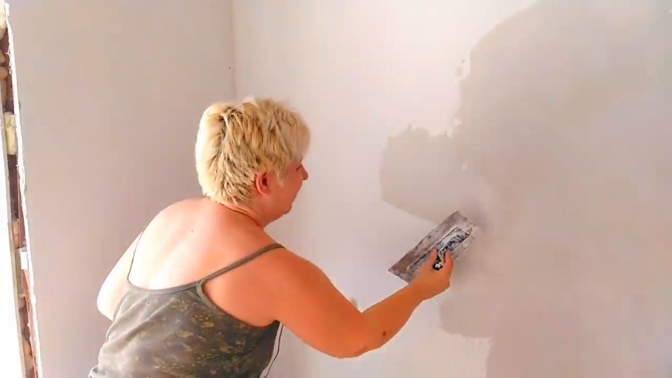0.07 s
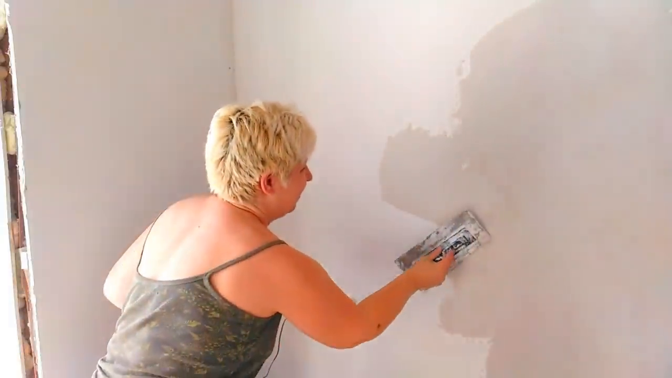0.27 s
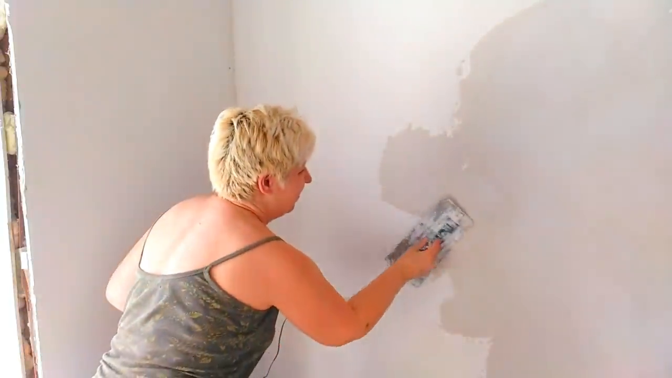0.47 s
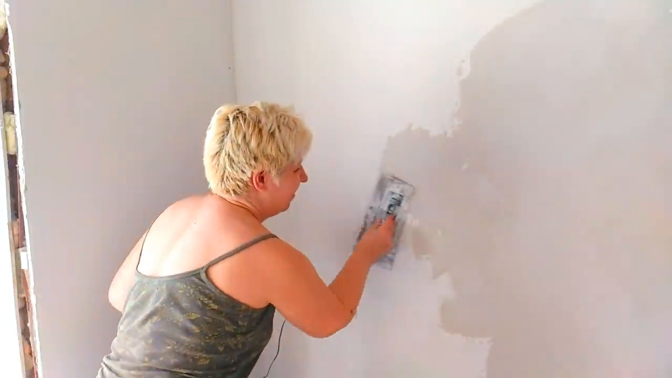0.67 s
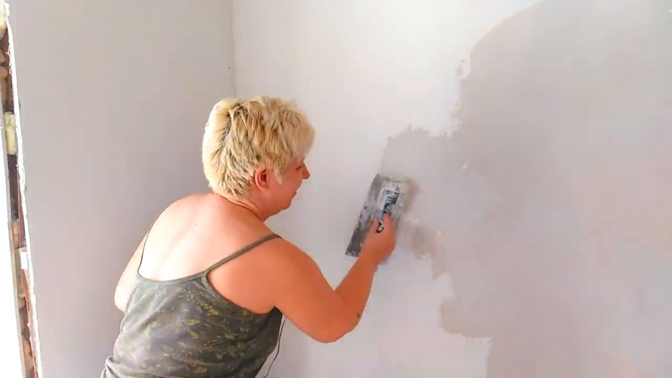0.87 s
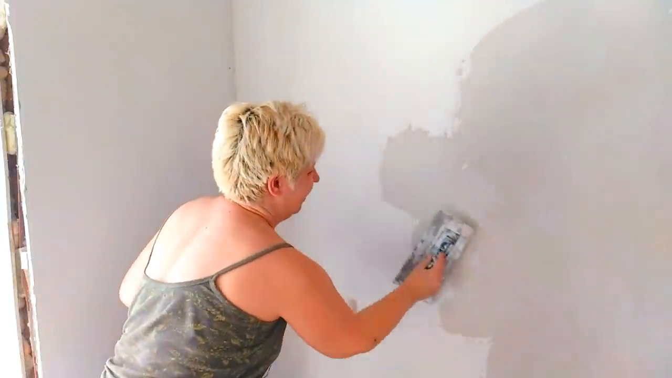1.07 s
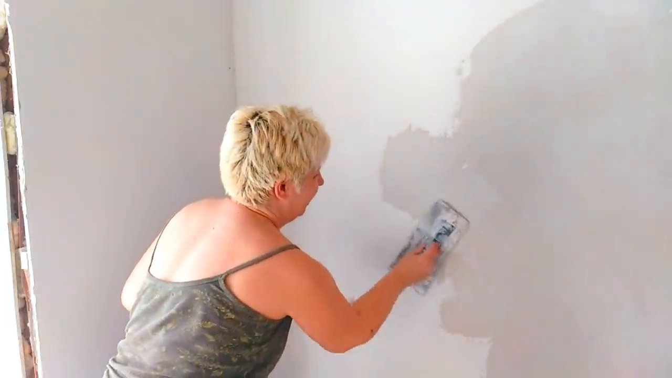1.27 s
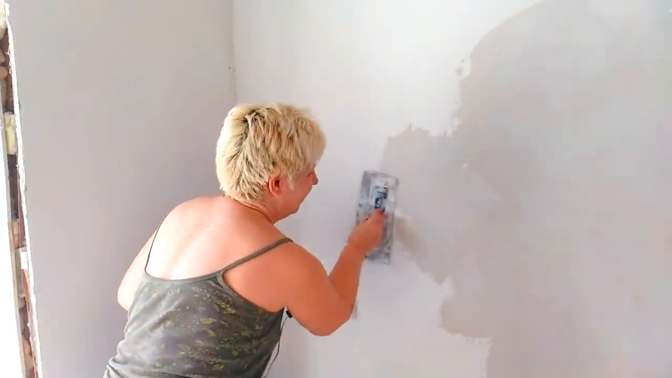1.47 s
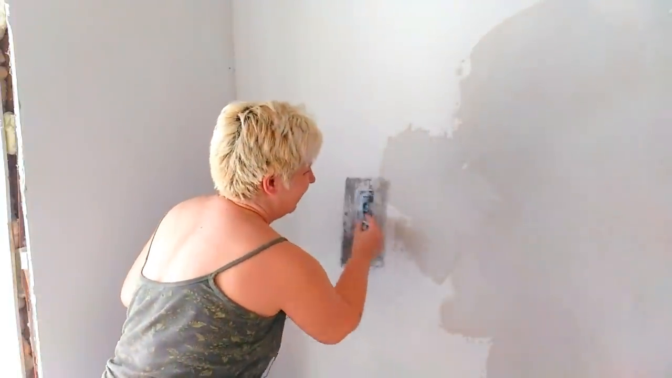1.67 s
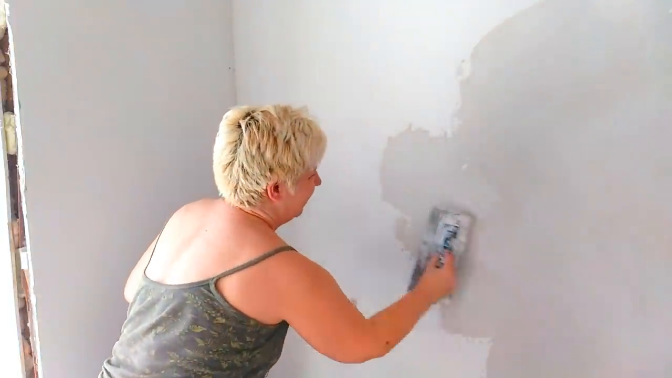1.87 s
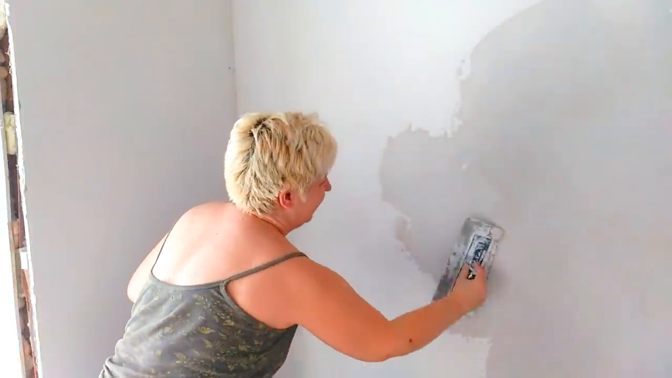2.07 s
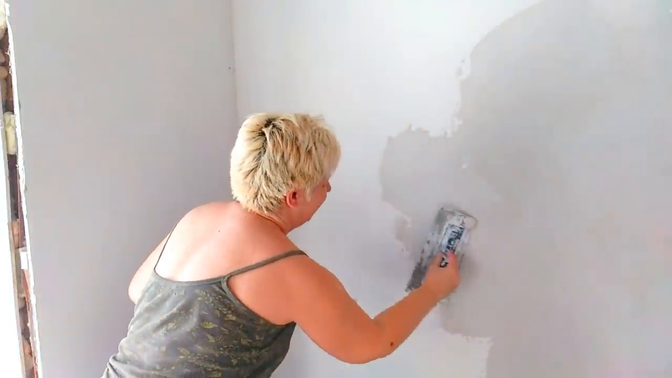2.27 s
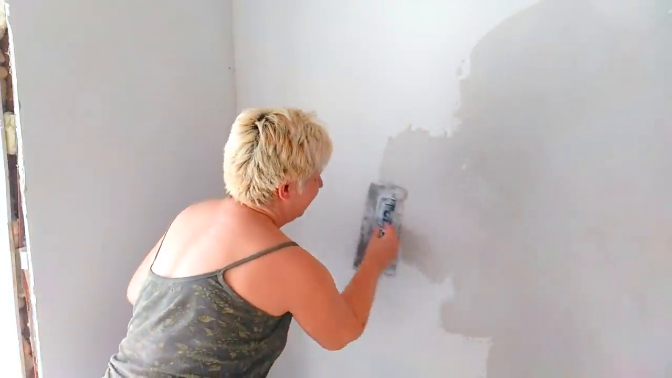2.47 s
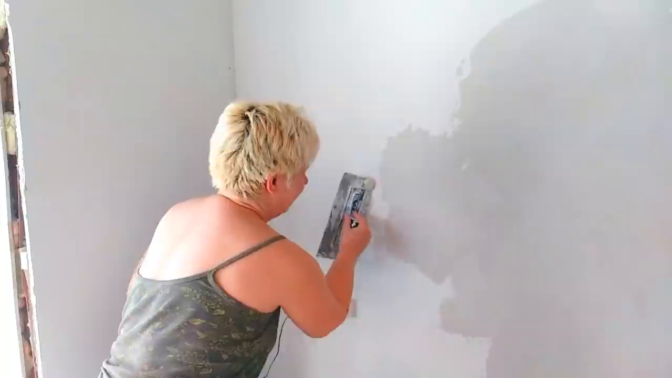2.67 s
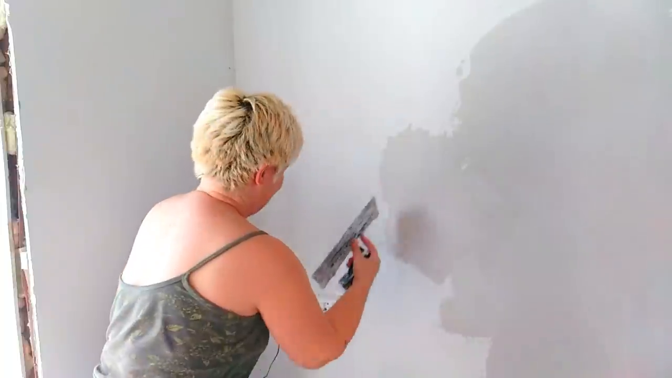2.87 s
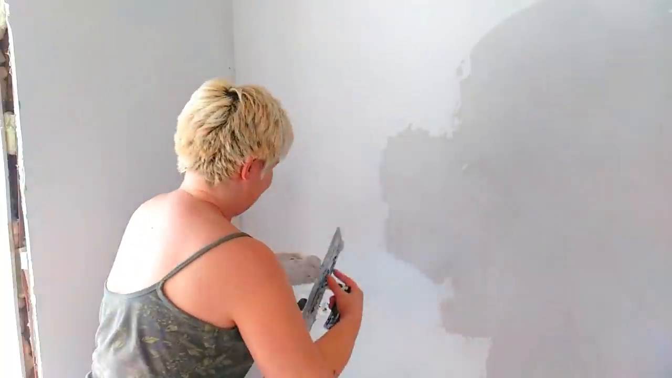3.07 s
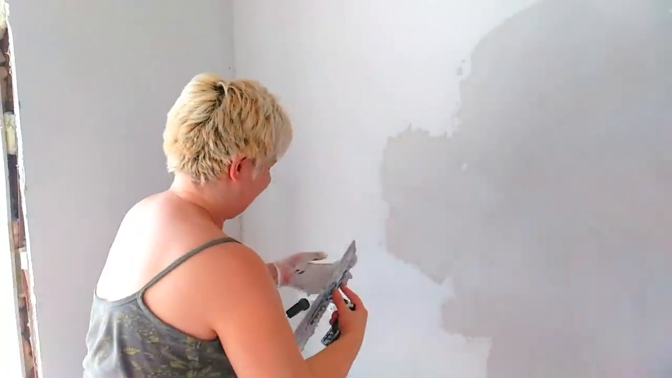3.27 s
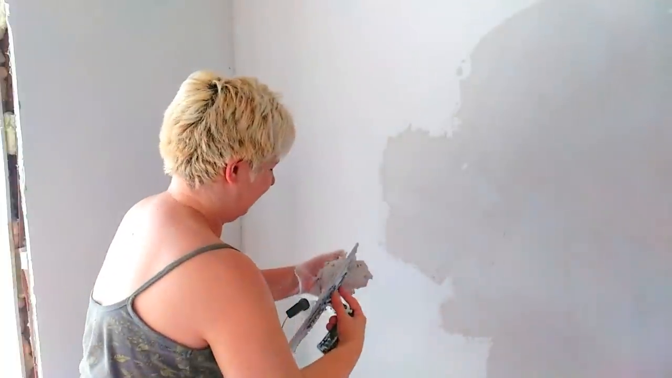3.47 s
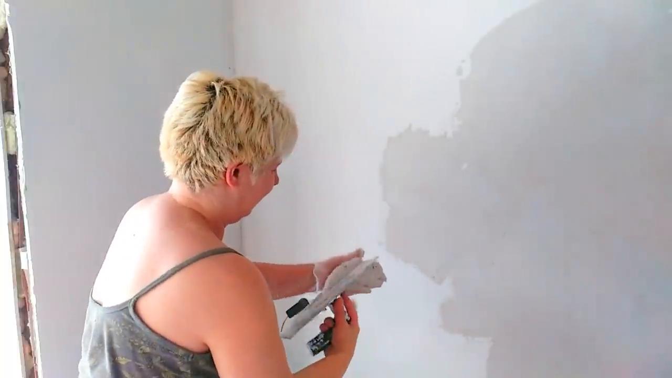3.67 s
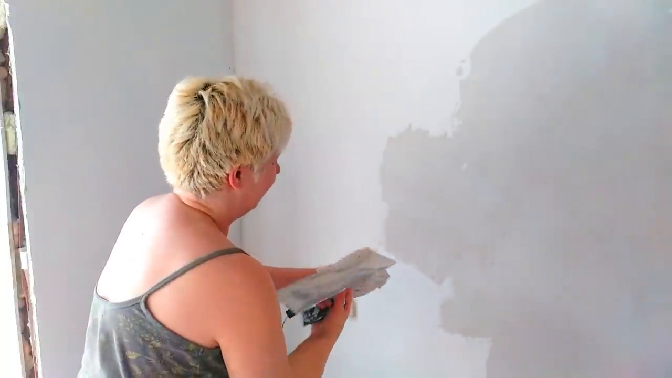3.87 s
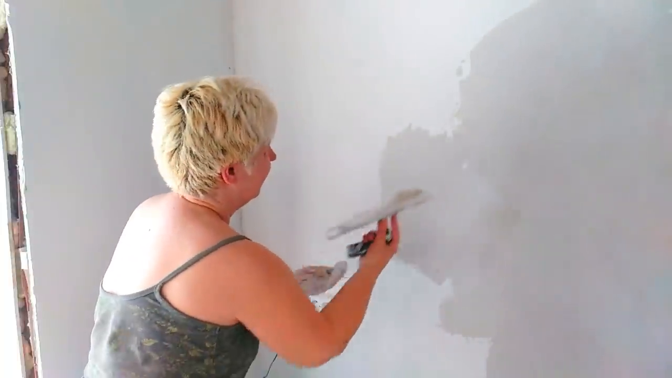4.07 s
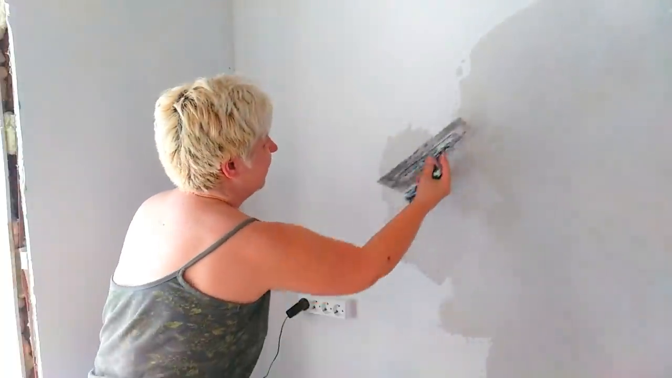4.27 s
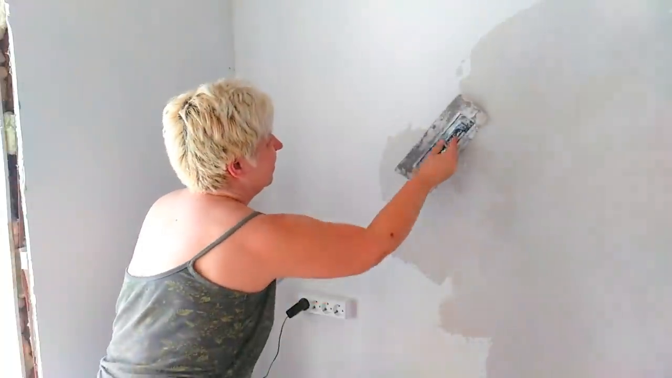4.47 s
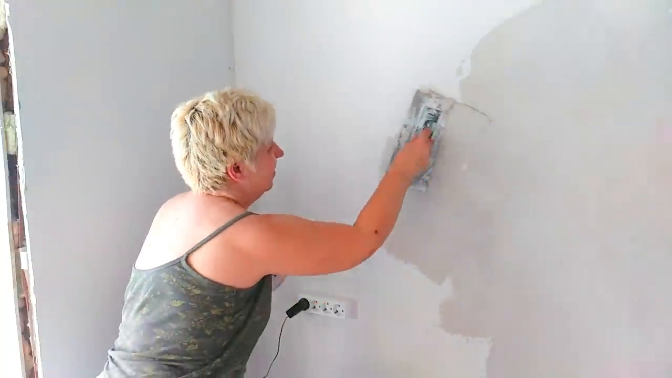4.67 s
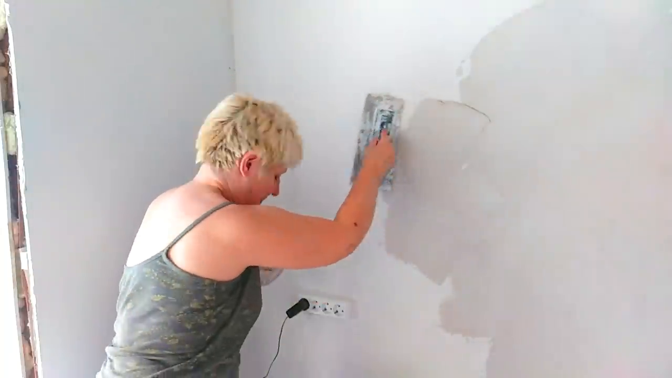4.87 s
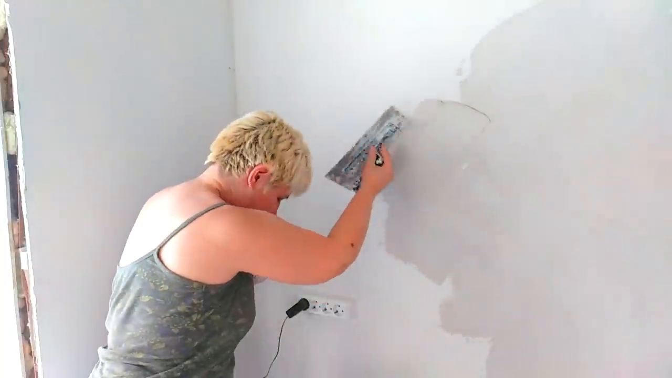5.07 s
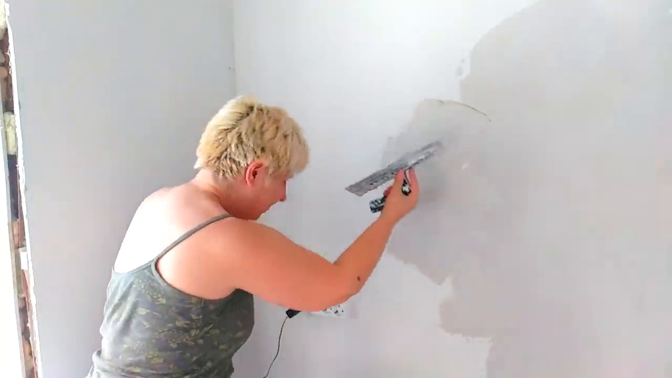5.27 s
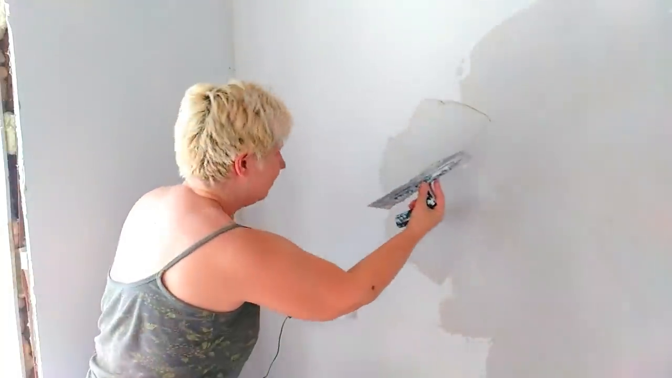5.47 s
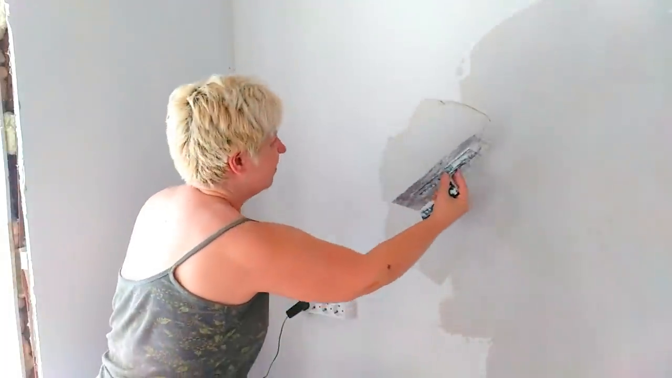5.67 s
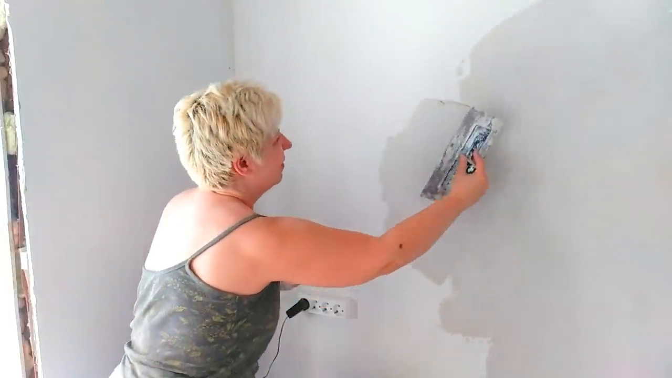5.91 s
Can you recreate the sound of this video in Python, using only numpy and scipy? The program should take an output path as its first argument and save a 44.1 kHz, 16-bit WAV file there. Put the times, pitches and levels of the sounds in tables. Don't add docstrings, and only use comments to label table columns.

```python
import sys
import numpy as np
from scipy import signal
from scipy.fft import rfft, irfft, next_fast_len
from scipy.io import wavfile
from scipy.ndimage import uniform_filter1d

SR = 44100
rng = np.random.default_rng(int(sys.argv[2]) if len(sys.argv) > 2 else 0)


def linear_from_db(decibels):
    return 10 ** (np.asarray(decibels, float) / 20)


def output_pcm(signal):
    pcm = np.clip(np.atleast_2d(signal).T, -1, 1) * 32767
    wavfile.write(sys.argv[1], SR, np.round(pcm).astype(np.int16))


N = 261954
TIME = np.arange(N) / SR
STEPS = np.arange(0, N / SR + .01, .001)


def evened(x):
    return x / np.sqrt(np.mean(x ** 2) + 1e-20)


def read(points, hz):
    f, value = np.transpose(points)
    return np.interp(np.log(hz + 1), np.log(f + 1), value)


def add(mix, start_s, sound):
    part = mix[round(start_s * SR):][:len(sound)]
    part += sound[:len(part)]


def coloured(x, points, lo_hz=0, hi_hz=1e6):
    size = next_fast_len(x.shape[-1])
    hz = np.fft.rfftfreq(size, 1 / SR) + 1e-3
    band = 1 / np.sqrt((1 + (lo_hz / hz) ** 8) * (1 + (hz / hi_hz) ** 8))
    return irfft(rfft(x, size) * linear_from_db(read(points, hz)) * band, size)[..., :x.shape[-1]]


def resonate(x, hz, width_hz):
    turn = np.exp(2j * np.pi * hz * TIME)
    r = np.exp(-np.pi * width_hz / SR)
    return 2 * (turn * signal.lfilter([1 - r], [1, -r], x / turn)).real


def lingering(db, db_per_s):
    fall = STEPS * np.reshape(db_per_s, (-1, 1))
    return np.maximum.accumulate(db + fall, axis=1) - fall


def emitted(db, t60):
    power = linear_from_db(2 * db)
    keep = np.exp(-2 * np.log(1000) / (t60 * SR))
    fresh = signal.lfilter([1, -keep], [1 - keep], power, zi=[-keep * power[0] / (1 - keep)])[0]
    return np.sqrt(np.maximum(uniform_filter1d(fresh, size=50), 0.11 * power))


def grit(per_s, spread_db):
    size = linear_from_db(spread_db * np.minimum(rng.exponential(1, N), 5)) * rng.choice([-1., 1.], N)
    return evened(size * (rng.random(N) < per_s / SR))


# time_s, pressure_db (level of the hiss), bite_db (of the edge)
IDLE = [(0.0, -58, -2), (0.09, -54.5, -2.5), (0.16, -58.5, 0), (0.28, -56, -2.5)]
FIRST_STROKE = [(0.438, -43.5, -8), (0.473, -42.5, -2), (0.479, -41, 5), (0.558, -25.5, -0.5),
                (0.616, -16.5, 0), (0.696, -16.5, -1.5), (0.74, -12, -2), (0.832, -17.5, 2.45),
                (1.09, -89, 3)]
SECOND_STROKE = [(1.348, -51, -16.5), (1.395, -39.5, 3.7), (1.436, -29, -4.5), (1.442, -32, 8.5),
                 (1.462, -20.5, 3), (1.482, -12, -3.1), (1.59, -13.5, 2), (1.708, -29, 8), (1.86, -62, -.7)]
THIRD_STROKE = [(2.21, -45.5, 5.5), (2.262, -26, 1.2), (2.352, -20.5, -3.5), (2.422, -16, -0.4),
                (2.454, -18, 1), (2.496, -12.5, -1), (2.56, -13, 0), (2.694, -14, 4.5),
                (2.878, -56.5, 16.5)]
LOADING = [(3.282, -62, 0.5), (3.292, -49.5, 0.5), (3.446, -44.5, 0.5), (3.47, -41.5, 5), (3.544, -44, 1.3),
           (3.722, -40.5, -0.5), (3.81, -45, 2.8), (3.866, -46, 7.5), (3.968, -56.5, 8)]
SETTING = [(4.61, -56.5, 1.5), (4.62, -39.5, 1.4), (4.646, -34.5, -1.8), (4.654, -33.5, -0.85),
           (4.692, -38, .3), (4.752, -37.5, 1.5)]
FOURTH_STROKE = [(4.754, -42, 11.5), (4.774, -31.5, 0), (4.857, -27.5, -0.5), (4.865, -25.5, 1.5),
                 (4.9, -22.5, 1.2), (4.963, -12, -1.4), (5.013, -21.5, 4.5), (5.159, -33.5, -14),
                 (5.244, -31, -6)]
LIFTING = [(5.33, -41, -6.5), (5.349, -30.5, -8), (5.371, -28, -7.5), (5.39, -33, 1.4), (5.41, -37, 0.5),
           (5.514, -53, 5.5), (5.558, -44.5, 2.5), (5.7, -67, -7)]
EASING = [(1.9, -64, 0.84), (1.99, -62, 1.6), (2.08, -61, .7), (2.16, -68, 3.3)]
LEAVING = [(2.9, -52.5, 1.5), (3.0, -58, 0.88), (3.156, -63.5, .7), (3.27, -86, -1.4)]
CARRYING = [(4.05, -48, -6), (4.134, -57, 4.5), (4.2, -59, 4.5), (4.218, -64, 1.5)]
# coarse_grit_db, blade_db, rumble_db, rasp_db (all against the hiss)
TEXTURES = [(2, 11.5, 6.5, 14.5), (0.8, -1.25, -8, -10.5), (0.1, -2.1, -11, -15.5), (-8.5, -6, -11, -6.5),
            (-11, -12.5, -33, -17), (-7.5, -6, -13, -14.5), (-7, -3, -9, -8), (-6.5, -5.5, -4, -5),
            (6, 8, 1, 1), (-2, -0.5, 8, 4), (-2.5, -0.5, -7, -2)]
# start_s, hiss_db, then against the hiss coarse_grit_db, blade_db, rumble_db
TOUCHES = [(0.29, -45.5, -7, 1, 9.5), (0.331, -52, -7, 12, 9.5), (0.341, -43, -18.5, 5.5, 16.5),
           (0.385, -51.5, -4.5, 9.5, 8), (1.205, -57, 0.5, -15, -8.5), (1.261, -45.5, -7, 6.5, 14),
           (1.277, -39.5, -5, -5.5, 6), (2.049, -62, 12, -4, 11), (2.17, -36.5, -11, -13, -3),
           (4.032, -41, -5.5, -12, -7), (4.222, -42.5, -14, 5, 0.5), (4.5, -32, -5, -4.5, -1),
           (4.53, -38.5, -5.5, -5.5, 11), (5.722, -58, -5.5, -6.5, -7), (5.745, -57.5, -12, 10.5, -6),
           (5.778, -60.5, 0, -22, -1), (5.803, -49.5, 2.5, 10, -4), (5.87, -67.5, 10.5, -1, -7),
           (5.905, -60.5, -8.5, -8.5, -12)]
FALLS = (212.4, 190, 180, 140, 160)
RESTS = (-71, -76, -73, -61.5, -62.5)
TOUCH_RISES = (0.01, 0.015, .008, .025, 0.036)


def controls():
    hold_s, touch_rasp_db, delay_s = .012, -7.5, .003
    bite_shares = [0, 0.4, 1, 0.95, 1.72]
    strokes = [IDLE, FIRST_STROKE, SECOND_STROKE, THIRD_STROKE, LOADING, SETTING, FOURTH_STROKE,
               LIFTING, EASING, LEAVING, CARRYING]
    power = linear_from_db(2 * np.array(RESTS))[:, None] * np.ones(len(STEPS))
    for stroke, texture in zip(strokes, TEXTURES):
        time_s, pressure_db, bite_db = np.transpose(stroke)
        bite = np.outer(bite_shares, np.interp(STEPS, time_s, bite_db))
        pressure = np.interp(STEPS, time_s, pressure_db, -200, -200)
        db = pressure + bite + np.array([0, *texture])[:, None]
        power = power + linear_from_db(2 * lingering(db, FALLS))
    rise = np.reshape(TOUCH_RISES, (-1, 1))
    for start_s, hiss_db, *texture in TOUCHES:
        contact = np.clip((STEPS - start_s) / rise + .2, 1e-9, 1)
        contact = contact * np.where(STEPS < start_s + rise + hold_s, 1, 1e-9)
        layers_db = np.array([0, *texture, texture[-1] + touch_rasp_db])[:, None]
        db = hiss_db + 20 * np.log10(contact) + layers_db
        power = power + linear_from_db(2 * lingering(db, FALLS))
    hiss, *others = 10 * np.log10(power)
    levels = [hiss, *(other - hiss for other in others)]
    return [np.interp(TIME - delay_s, STEPS, level) for level in levels]


# pitch_hz, level_db (per Hz)
SCRAPE_TONE = [(470, -6), (800, 4), (940, 0.5), (1090, 3.5), (1280, 4), (1740, 6), (2500, 2.5), (2690, 2),
               (3450, -5), (5450, -10), (6320, -10.5), (9050, -4), (10500, -7.5), (12200, -15.5),
               (15400, -24)]
BAND_EDGES = (900, 4000, 7000)
# pitch_hz, level_db (per Hz)
WALL_TONE = [(65, -47), (110, 2), (193, -6.5), (226, 0.5), (324, -9.5), (362, -7.5), (1200, 1.5),
             (1560, -40.5), (2640, -120)]
# pitch_hz, width_hz, level_db
WALL_RINGS = [(239, 98, -13.5), (325, 78, -11), (452, 34, -24.5)]


def scrape():
    blade_hz, coarse_hz, hiss_hz = BAND_EDGES
    hiss_db, coarse_db, blade_db, rumble_db, rasp_db = controls()
    chatter = linear_from_db(1.8 * evened(uniform_filter1d(rng.standard_normal(N), size=900)))
    sand = grit(6000, spread_db=1.0)
    hiss = evened(coloured(sand, SCRAPE_TONE, lo_hz=hiss_hz))
    coarse = evened(coloured(sand, SCRAPE_TONE, coarse_hz, hiss_hz))
    blade = evened(coloured(sand, SCRAPE_TONE, blade_hz, coarse_hz))
    edge = hiss * emitted(hiss_db, 0.18)
    edge = edge + coarse * emitted(hiss_db + coarse_db, 0.47)
    edge = edge + blade * emitted(hiss_db + blade_db, 0.38)

    shaken = evened(coloured(grit(4000, spread_db=-0.5), WALL_TONE, lo_hz=133, hi_hz=blade_hz))
    rings = sum(linear_from_db(db) * evened(resonate(shaken, hz, width_hz)) for hz, width_hz, db in WALL_RINGS)
    shaken = evened(shaken + rings)
    rumble = coloured(shaken, [(20, 0), (20000, 0)], hi_hz=430)
    rasp = shaken - rumble
    wall = rumble * emitted(hiss_db + rumble_db, 0.71) + rasp * emitted(hiss_db + rasp_db, 0.35)
    return evened(chatter) * edge + linear_from_db(-2.5) * wall


# (sent into the room, against level_db)
SNAPS = [(0.345, -19, 985, 15), (1.279, -26.5, 1360, 14), (2.045, -33.5, 515, 11.5), (2.174, -21, 1833, 17),
         (2.205, -29, 2290, 4), (4.034, -27.5, 6230, 17), (4.225, -20.5, 1320, 6.5), (4.505, -23, 520, 9),
         (4.867, -6.5, 6300, 21), (5.249, -24, 780, 8.5), (5.386, -22, 1510, -2),
         (5.745, -29.5, 3380, 13.5), (5.805, -25.5, 645, 4), (5.819, -21.5, 3620, 7.5)]


def snaps():
    straight, thrown, t = np.zeros(N), np.zeros(N), TIME[:600]
    for start_s, level_db, hz, room_db in SNAPS:
        shape = np.exp(-1.6 * hz * t) * (1 - np.exp(-9 * hz * t))
        click = linear_from_db(level_db) * np.cos(2 * np.pi * hz * t) * shape
        add(straight, start_s, click)
        add(thrown, start_s, linear_from_db(room_db) * click)
    return straight, thrown


# start_s, level_db, first_pitch_hz, last_pitch_hz
SLAPS = [
    (0.342, -39.5, 1184, 266.5),
    (4.227, -32.5, 749, 200),
    (4.506, -30, 590, 180),
    (5.806, -40, 648, 200),
]
POCKETS = (.72, 1, 1.31, 1.7)


def slaps():
    slide_s, t60_s, rise_s = .014, 0.095, 0.0025
    out, t = np.zeros(N), TIME[:SR // 5]
    for start_s, level_db, first_hz, last_hz in SLAPS:
        turns = np.cumsum(last_hz + (first_hz - last_hz) * np.exp(-t / slide_s)) / SR
        rings = sum(np.sin(2 * np.pi * ratio * turns) * linear_from_db(-60 * ratio * t / t60_s) for ratio in POCKETS)
        add(out, start_s, linear_from_db(level_db) * rings * (1 - np.exp(-t / rise_s)))
    return out


# start_s, level_db, pitch_hz, overtones_db (against the blow), t60_s (time to fade 60 dB)
THUMPS = [
    (0.293, -41, 77.8, 1.5, 0.13),
    (0.3371, -15.5, 83.3, -8, 0.28),
    (1.2614, -18.5, 77.4, -10.5, 0.35),
    (2.176, -20, 83, -4, 0.19),
    (2.319, -32.5, 77.1, -20, 0.4),
    (4.232, -57, 64.6, 22, 0.17),
    (4.5, -30, 64.3, 5.5, 0.31),
    (5.382, -20.5, 69.7, -10, 0.24),
    (5.69, -39, 95, -10, 0.2),
    (5.795, -25.5, 63.6, -8, 0.19),
]
# pitch_hz, level_db, t60_share (of the blow's t60_s)
OVERTONES = [(145.5, -9, 1.2), (239, -3.5, 1.1), (281, -10, 1.1), (358, -24, 1.8), (526, -9, .4),
             (586, -19, 0.1)]


def thumps():
    swell_s = 0.016
    out, t = np.zeros(N), TIME[:SR // 2]
    for start_s, level_db, hz, overtones_db, t60_s in THUMPS:
        ring = np.sin(2 * np.pi * hz * t) * linear_from_db(-60 * t / t60_s)
        for over_hz, over_db, share in OVERTONES:
            fade = linear_from_db(overtones_db + over_db - 60 * t / (t60_s * share))
            ring = ring + np.sin(2 * np.pi * over_hz * t) * fade
        add(out, start_s, linear_from_db(level_db + 5.5) * ring * (1 - np.exp(-(t / swell_s) ** 2)))
    return out


def hum():
    swell_s, hum_db, push_share, wall_share, fall_db_per_s = 0.059, -25.5, 0.83, 0.23, 46.5
    noise = rng.standard_normal(N)
    hiss_db, _, _, rumble_db, _ = controls()
    push_db = uniform_filter1d(hiss_db + wall_share * rumble_db, size=2000)
    push_db = np.interp(STEPS - swell_s, TIME, push_db)
    level_db = lingering(hum_db + push_share * push_db[None], fall_db_per_s)[0]
    note = evened(resonate(resonate(noise, 77, 7), 77, 28))
    return linear_from_db(np.interp(TIME, STEPS, level_db)) * note


# pitch_hz, t60_s
ROOM = [(200, 0.61), (700, 0.34), (2000, 0.37), (6000, 0.37), (12000, 0.24)]


def echoes():
    size = SR // 2
    taps = np.zeros((2, size))
    at = np.arange(0, size - 10, 10) + rng.integers(0, 10, (2, (size - 1) // 10))
    np.put_along_axis(taps, at, rng.choice([-1., 1.], at.shape), axis=1)
    hz, t, z = signal.stft(taps, SR, nperseg=256, boundary="even")
    decay = linear_from_db(-60 * t / read(ROOM, hz)[:, None])
    decay = decay / np.linalg.norm(decay, axis=1, keepdims=True)
    tail = signal.istft(z * decay, SR, nperseg=256)[1][:, :size]
    tail = tail * (1 + 2.22 * np.exp(-TIME[:size] / 0.0023))
    return tail / np.linalg.norm(tail, axis=1, keepdims=True)


# pitch_hz, likeness (0 to 1)
LIKENESS = [(60, 0.93), (300, 0.89), (640, 0.62), (1400, .02), (15000, 0.018)]


def paired(a, b):
    size = next_fast_len(len(a))
    same = np.clip(read(LIKENESS, np.fft.rfftfreq(size, 1 / SR)), 0, 1)
    turn, a, b = np.arccos(same) / 2, rfft(a, size), rfft(b, size)
    middle, side = np.cos(turn) * a, np.sin(turn) * b
    return irfft([middle + side, middle - side], size)[:, :N]


def room(x, count=9, places_per_s=20):
    place = TIME * places_per_s
    wet = 0
    for k in range(count):
        away = (place - k + count / 2) % count - count / 2
        window = np.cos(np.pi / 2 * np.clip(away, -1, 1))
        wet = wet + signal.fftconvolve((x * window)[None], echoes(), axes=1)[:, :N]
    return paired(*wet)


# peak_s, level_db, length_s
JOLTS = [(0.0, -49, 0.14), (0.391, -32.5, 0.25), (0.8, -47.5, 0.46), (1.3, -42.5, .2), (1.55, -40.5, 0.2),
         (2.28, -37, 0.1), (2.545, -49, 0.37), (4.177, -52, 0.17), (4.534, -35.5, 0.21), (4.899, -34, .25),
         (5.4, -37, 0.083), (5.577, -41.5, 0.26), (5.82, -32, 0.11)]


def handling():
    calm_db, fall_db, rise_share = -55, 13.5, 0.16
    peak_s, level_db, length_s = np.transpose(JOLTS)[:, :, None]
    width_s = length_s * np.where(STEPS < peak_s, rise_share, 1)
    jolts = linear_from_db(level_db - fall_db * ((STEPS - peak_s) / width_s) ** 2).sum(0)
    return np.interp(TIME, STEPS, linear_from_db(calm_db) + jolts)


# pitch_hz, level_db (per Hz)
AIR_TONE = [(8.8, -29), (15, 0), (81, -2.5), (140, -7.5), (447, -9.5), (1230, -19), (5260, -23),
            (6830, -28), (8870, -18.5), (15400, -36.5)]


def air():
    quiet = evened(coloured(rng.standard_normal((2, N)), AIR_TONE, lo_hz=32))
    swing_tone = [(10, 2.5), (25, 6), (45, -1.5), (70, -11)]  # pitch_hz, level_db
    a, b = coloured(rng.standard_normal((2, N)), swing_tone, hi_hz=54.1)
    swing = evened(np.array([a + 0.16 * b, a - 0.24 * b]))
    return linear_from_db(-44.5 - 8.5) * quiet + handling() * swing


def scene():
    clicks, thrown = snaps()
    blows, wet_slaps = thumps(), slaps()
    board = (blows + hum()) * linear_from_db([[.7], [-.7]])
    wet = room(scrape() + thrown + linear_from_db(-14) * blows + linear_from_db(1) * wet_slaps)
    return linear_from_db(1.5) * wet + clicks + wet_slaps + board + air()


# pitch_hz, dip_db
DIPS = [(2200, -60), (3000, -5.5), (4000, -3.1), (6800, -2.5), (8000, -6), (10500, -6), (11800, -1.6),
        (15000, -.8)]


def thinned(x):
    hz, _, z = signal.stft(x, SR, nperseg=1024, noverlap=768)
    power = uniform_filter1d((abs(z) ** 2).sum(0), size=3, axis=1)
    narrow = uniform_filter1d(power, size=5, axis=0)
    wide = uniform_filter1d(power, size=41, axis=0)
    treble = power[hz > 2000].sum(0)
    steady = np.roll(treble, -4) < 4 * np.roll(treble, 3)
    weak = (narrow < wide * linear_from_db(2 * read(DIPS, hz))[:, None]) & steady
    keep = 1 - uniform_filter1d(weak * 1., size=3, axis=1).clip(0, .5) * 1.94
    return signal.istft(z * keep, SR, nperseg=1024, noverlap=768)[1][:, :N]


def top_cut(x):
    return signal.sosfilt(signal.butter(12, 15550, fs=SR, output="sos"), x)


def record(dry):
    clipped = np.clip(thinned(dry), -1, 1)
    return top_cut(clipped)


dry = scene()
out = record(dry)
output_pcm(out)
```